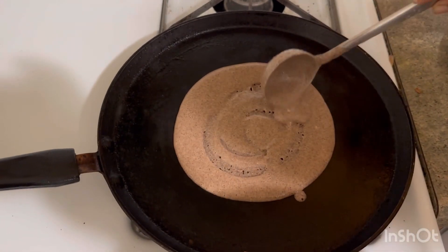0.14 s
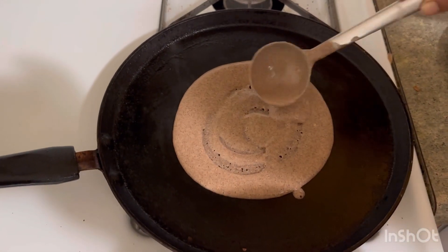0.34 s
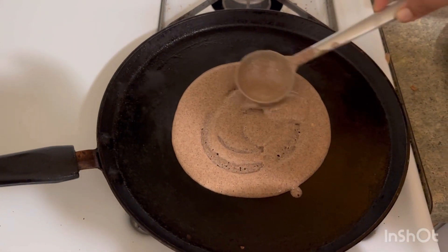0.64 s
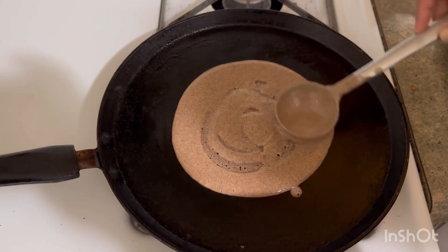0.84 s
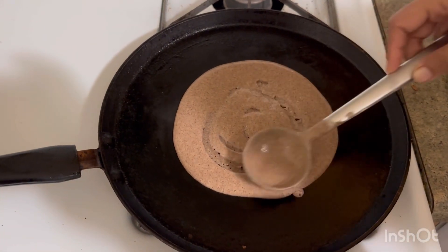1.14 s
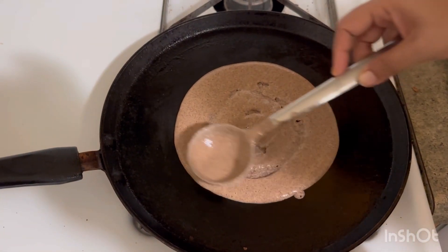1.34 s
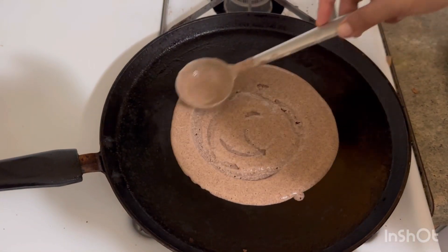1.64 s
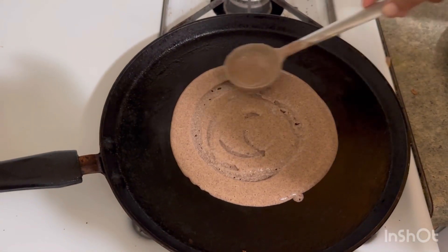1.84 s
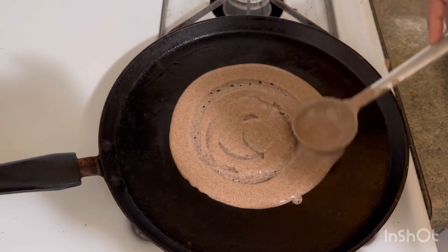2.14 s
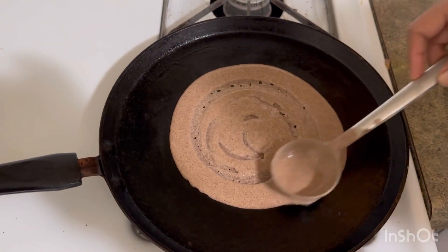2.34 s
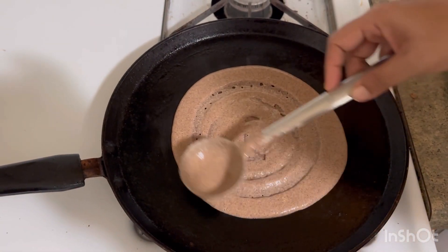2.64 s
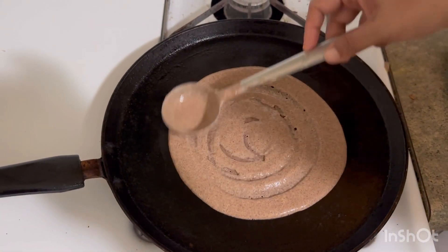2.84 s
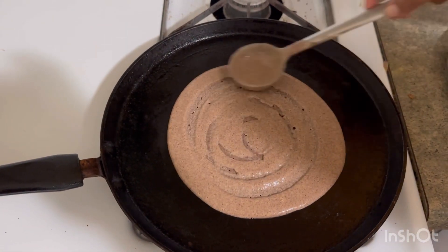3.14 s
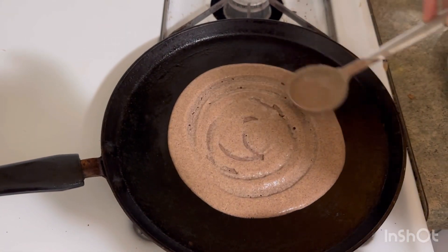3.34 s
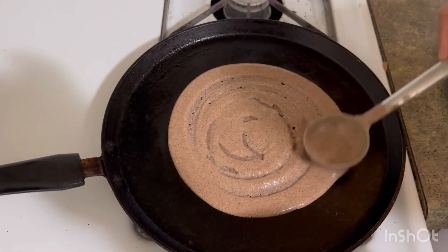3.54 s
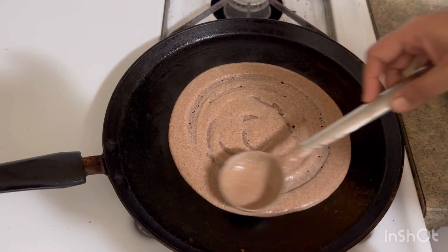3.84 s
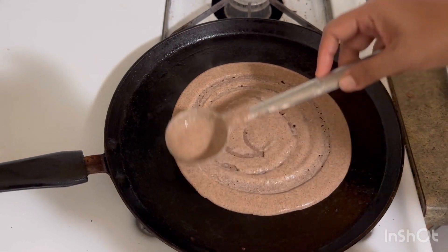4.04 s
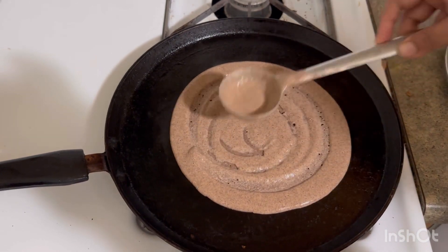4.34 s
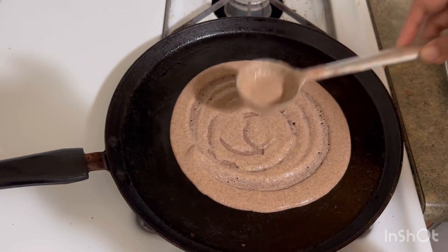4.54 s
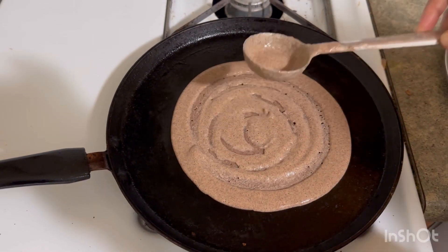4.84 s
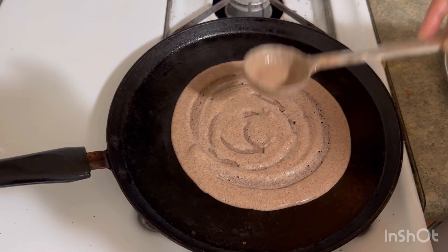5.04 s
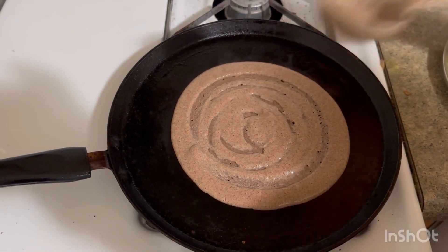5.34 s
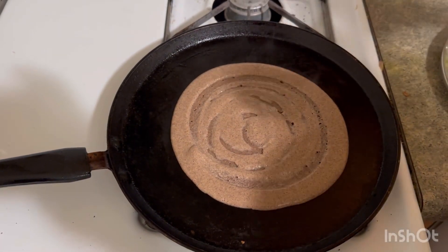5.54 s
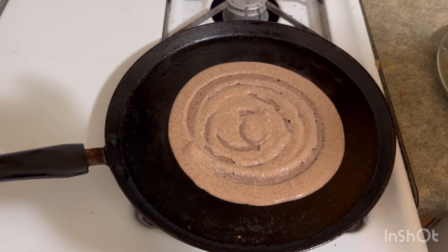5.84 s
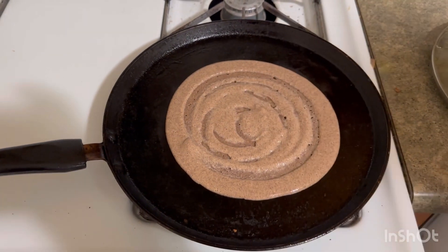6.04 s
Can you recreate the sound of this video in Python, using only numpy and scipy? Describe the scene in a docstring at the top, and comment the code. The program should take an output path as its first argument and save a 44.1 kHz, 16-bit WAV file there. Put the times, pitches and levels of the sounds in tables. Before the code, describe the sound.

Batter fizzes lightly on a hot griddle in a small kitchen, heard close, with crisp little bubble pops through the first 0.7 seconds. At about 0.8 seconds a dense, bright sizzle swells up as a steel ladle spreads the batter in circles. It stays strong until about 4 seconds, its slightly hollow colour shifting with each turn. Soft, brief wet rubs of the ladle come near 0.6, 1, 1.7 and 3 seconds, and sharper pops stand out near 1.3 and 3.8 seconds. From 4 seconds the sizzle thins to single pops, leaving only a faint airy hiss after 5 seconds, with a soft scuff near 5.5. At 6 seconds the ladle is put down a little to the right with a sharp, briefly ringing metallic knock and a tiny bounce, the loudest sound. A faint, unsteady appliance hum and low stove rumble lie underneath throughout.

```python
"""A small kitchen: a steel ladle spreads batter in circles on a hot griddle.
Steam bursts from under the wet batter as a dense sizzle, coloured by the hollows under the rubbing
ladle; it thins to single pops once the ladle lifts. The ladle is put down beside the stove with a
sharp, ringing knock. An appliance hum and the low rumble of the stove lie underneath."""
import sys
import numpy as np
from scipy import signal
from scipy.fft import rfft, irfft, next_fast_len
from scipy.io import wavfile

SR = 44100
rng = np.random.default_rng(int(sys.argv[2]) if len(sys.argv) > 2 else 0)


def int16_out(signal):
    """Quantize to a 16-bit WAV file."""
    q = np.round(np.clip(np.atleast_2d(signal).T, -1, 1) * 32767)
    wavfile.write(sys.argv[1], SR, q.astype(np.int16))


N = 272538
TIME = np.arange(N) / SR
FULL_VIGOUR_DB = -46.5  # fizz level of the liveliest sizzle


def amp(db):
    """Decibels to gain."""
    return 10 ** (np.asarray(db) / 20)


def unit_rms(x):
    """Scale to unit power."""
    return x / np.sqrt(np.mean(x ** 2) + 1e-20)


def at_time(curve):
    """A (time_s, value) table at every sample."""
    return np.interp(TIME, *np.transpose(curve))


def at_hz(curve, hz):
    """A (freq_hz, value) table read on a log-frequency axis."""
    freq_hz, value = np.transpose(curve)
    return np.interp(np.log(hz + 1e-9), np.log(freq_hz), value)


def filtered(x, response):
    """Apply a frequency response, given as a function of Hz."""
    size = next_fast_len(N + SR // 4)
    return irfft(rfft(x, size) * response(np.fft.rfftfreq(size, 1 / SR)), size)[..., :N]


def coloured(x, spectrum):
    """Equalise by a (freq_hz, gain_db) table."""
    return filtered(x, lambda hz: amp(at_hz(spectrum, hz)))


def band(x, low_hz, high_hz):
    """Causal band-pass."""
    sos = signal.butter(3, [low_hz, min(high_hz, .49 * SR)], "band", fs=SR, output="sos")
    return signal.sosfilt(sos, x + 1e-18)


def resonance(x, hz, width_hz):
    """Two-pole resonance, unit peak gain."""
    r = np.exp(-np.pi * width_hz / SR)
    feedback = [1, -2 * r * np.cos(2 * np.pi * hz / SR), r * r]
    return signal.lfilter(np.array([1, 0, -1]) * (1 - r * r) / 2, feedback, x + 1e-18)


def narrowed(x, hz, width_hz):
    """Two equal resonances in series, output at unit power."""
    return unit_rms(resonance(resonance(x, hz, width_hz), hz, width_hz))


def gliding_resonance(x, hz, width_hz):
    """Resonance with a per-sample centre, unit peak gain."""
    r = np.exp(-np.pi * width_hz / SR)
    carrier = np.exp(2j * np.pi * np.cumsum(hz) / SR)
    return 2 * np.real(carrier * signal.lfilter([1 - r], [1, -r], x / carrier))


def decay(t, t60_s):
    """Exponential decay from t = 0."""
    return (t >= 0) * np.exp(-np.log(1000) * np.clip(t / t60_s, 0, 10))


def drift(rate_hz):
    """Slow random wander, unit power."""
    return unit_rms(filtered(rng.standard_normal(N), lambda hz: 1 / (1 + (hz / rate_hz) ** 2)))


def impulses(per_s, spread_db):
    """Random impulses, most weak and a few strong, at even power."""
    chance = np.clip(per_s / SR, 1e-4, 1)
    sizes = amp(spread_db * np.minimum(rng.exponential(1, N), 4.5)) * rng.choice([-1, 1], N)
    return unit_rms((rng.random(N) < chance) * sizes / np.sqrt(chance))


def reflections(x, t60_s, delay_s):
    """Dense echoes with unit energy."""
    t = TIME[:SR // 2]
    echoes = rng.standard_normal(len(t)) * decay(t - delay_s, t60_s)
    return signal.fftconvolve(x, echoes / np.linalg.norm(echoes))[:N]


def panned(x, balance):
    """Tip the stereo balance by a (freq_hz, left_over_right_db) table."""
    return filtered(x, lambda hz: amp(np.outer([.5, -.5], at_hz(balance, hz))))


# Left-right likeness of a wide source: freq_hz, coherence
COHERENCE = [(60, 0.77), (200, 0.79), (500, 0.8), (1300, 0.61), (1620, 0.2), (2050, 1), (2800, 0.3),
             (3200, 0.74), (3500, 0.53), (4130, 0.75), (5300, 0.19), (6100, .6), (7400, 0.22), (8400, 0.79),
             (9500, 0.48), (11000, 1), (12700, 0.68), (14300, 1), (15600, 0.72)]

def spread(mid, side):
    """Left and right of a wide source, at even power."""
    def mid_share(hz):
        return (1 + np.clip(at_hz(COHERENCE, hz), 0, 1)) / 2
    mid = filtered(mid, lambda hz: np.sqrt(mid_share(hz)))
    side = filtered(side, lambda hz: np.sqrt(1 - mid_share(hz)))
    return np.array([mid + side, mid - side])


# Stove rumble spectrum: freq_hz, gain_db
RUMBLE_SPECTRUM = [(20, -40), (45, -9), (70, -1.5), (115, 1.5), (155, -3.5), (220, -0.5), (330, -1.5),
                   (420, -4), (600, -14), (1500, -39), (5000, -26.5)]
# Steady noise bands: centre_hz, width_hz, level_db
DRONE_BANDS = [(54.7, 43, -73.5), (112.6, 19, -80.5), (220, 59, -85.5), (419.2, 10.4, -82)]

def stove_rumble(fizz_db):
    """Low rumble, slightly louder under a lively sizzle, with a faint drone."""
    level_db = -71.5 + 1.5 * amp(fizz_db - FULL_VIGOUR_DB) + 2.8 * drift(1.03)
    drone = sum(amp(db) * narrowed(rng.standard_normal(N), hz, width_hz)
                for hz, width_hz, db in DRONE_BANDS)
    mid, side = (amp(level_db) * unit_rms(coloured(rng.standard_normal(N), RUMBLE_SPECTRUM))
                 for _ in range(2))
    return spread(drone + mid, side)


# Swells of the hum: start_s, length_s, level_db
HUM_SWELLS = [(0.56, 0.19, -64), (1.09, 1.16, -74), (1.56, 0.16, -67), (3.047, 0.063, -67), (4.2, 0.4, -79),
              (4.8, 0.74, -63.5), (6.01, 0.19, -59)]

def appliance_hum(pitch_hz=59.2, level_db=-74, ramp_s=0.032):
    """An unsteady hum with a weak octave, swelling now and then."""
    swells = sum(amp(db) * np.interp(TIME - start_s, [0, ramp_s, length_s, length_s + ramp_s], [0, 1, 1, 0])
                 for start_s, length_s, db in HUM_SWELLS)
    phase = 2 * np.pi * np.cumsum(pitch_hz + 1.17 * drift(5.3)) / SR
    tone = np.sqrt(2) * (np.sin(phase) + amp(-23) * np.sin(2 * phase))
    return tone * (amp(level_db + 4.8 * drift(7.3)) + swells)


# Ladle in the batter, then moved away: start_s, length_s, centre_hz, width_hz, level_db
RUB_STROKES = [(0.558, 0.0063, 2230, 300, -54.5), (0.563, 0.074, 2310, 300, -62),
               (0.555, 0.075, 1410, 220, -68), (0.562, 0.07, 2700, 1600, -61), (0.56, 0.09, 88, 70, -64),
               (0.6, 0.049, 900, 1400, -61.5), (0.652, 0.085, 1100, 1400, -68),
               (1.027, 0.096, 750, 1200, -60), (1.592, 0.061, 332, 400, -69), (1.7, 0.06, 1500, 1800, -55),
               (1.994, 0.036, 377, 500, -61.5), (3.04, 0.078, 95, 90, -61), (3.043, 0.16, 597, 800, -62),
               (3.032, 0.17, 1500, 1800, -55), (3.06, 0.046, 330, 300, -65), (3.537, 0.043, 305, 140, -66),
               (3.902, 0.05, 650, 500, -66.5), (4.424, 0.056, 900, 1200, -68),
               (4.983, 0.042, 650, 600, -78.5), (5.123, 0.026, 750, 700, -76),
               (5.495, 0.058, 1050, 1200, -64.5), (5.501, 0.083, 125, 112, -62.5),
               (5.51, 0.054, 2400, 900, -70), (5.533, 0.17, 292, 250, -70.5), (5.577, 0.11, 1510, 700, -76),
               (5.77, 0.023, 646, 400, -79), (5.927, 0.027, 520, 400, -74)]

def ladle_rubs(attack_s=0.0015):
    """Wet friction: dense slips sound through the cup of the ladle."""
    out = np.zeros(N)
    slips = impulses(per_s=4000, spread_db=2.5)
    for start_s, length_s, hz, width_hz, db in RUB_STROKES:
        t = TIME - start_s
        stroke = np.clip(t / attack_s, 0, 1) * decay(np.maximum(t - length_s, 0), t60_s=0.019)
        out += amp(db) * stroke * narrowed(slips, hz, width_hz)
    return out


# Dense clatter between the metal's main modes: freq_hz, gain_db
CLATTER_SPECTRUM = [(60, -10), (200, -19), (380, -6.5), (700, -0.5), (1450, 2.5), (1800, -10.5),
                    (2300, 3.5), (3000, -4), (4200, 6), (8800, 5), (10000, 1.5), (10800, 3), (11800, 2.5),
                    (15500, -4.5)]

def metal_shimmer(t, count=60, low_hz=3000, high_hz=11030):
    """Weak, unevenly spaced upper modes; complex, so their phase can be turned."""
    hz = low_hz + (high_hz - low_hz) * (np.arange(count) + rng.random(count)) / count
    gains = amp(at_hz(CLATTER_SPECTRUM, hz) + 2.4 * rng.standard_normal(count))
    phasors = gains / np.linalg.norm(gains) * np.exp(2j * np.pi * rng.random(count))
    return np.sqrt(2) * phasors @ np.exp(2j * np.pi * np.outer(hz, t))


# Landing and bounces: start_s, level_db
CONTACTS = [(6.0093, 0.5), (6.0273, -10), (6.036, -5)]
# Modes of ladle and bowl: pitch_hz, gain_db, t60_s
METAL_MODES = [(560, -11.5, 0.3), (634, -15, 0.22), (686, -2, 0.31), (721, 0, 0.24), (778, -6, 0.31),
               (864, -1.5, 0.19), (984, -0.5, 0.13), (1050, -9, 0.14), (1290, -1, 0.18), (1344, 5, 0.25),
               (1365, -1.5, 0.33), (1430, -5, 0.31), (1500, 0, 0.19), (1590, -12, 0.37), (2015, -8, 0.19),
               (2270, -2.5, 0.26), (2400, -9, 0.19), (3370, -12, 0.27), (3620, -8, 0.22), (3760, -1, 0.22),
               (4060, -7, 0.24), (4130, 11, 0.039), (4300, 14, 0.035), (4560, -6, 0.2), (4760, 3.5, 0.065),
               (5100, -6, 0.22), (5300, -2, 0.2), (5346, 5, 0.23), (5749, -7, 0.27), (5950, -1, 0.11),
               (6640, 2, 0.21), (6954, 2, 0.15), (7060, 1, 0.17), (7630, 5, 0.14), (8100, 6, 0.12),
               (8500, 6, 0.12), (8840, 4, 0.15), (9130, 4, 0.2), (9420, 5, 0.14), (10750, 11, 0.08),
               (13200, 4, 0.07)]

def ladle_contacts(phase_rad, shimmer):
    """Each contact cracks and rings the metal; the kitchen holds a tail whose lows last longer."""
    out = np.zeros(N)
    for start_s, db in CONTACTS:
        start = round(start_s * SR)
        t = TIME[:N - start]
        clatter = unit_rms(coloured(rng.standard_normal(N), CLATTER_SPECTRUM))[start:]
        crack = amp(-20.5) * clatter * decay(t, t60_s=0.021)
        bright = amp(-40) * np.imag(shimmer[:len(t)] * np.exp(1j * phase_rad)) * decay(t, t60_s=0.21)
        tail = amp(-34.5) * clatter * decay(t, t60_s=0.33)
        tail += amp(-32) * band(clatter, 60, 2330) * decay(t, t60_s=0.39)
        low_noise = unit_rms(resonance(rng.standard_normal(len(t)), hz=198, width_hz=110))
        thud = amp(-53) * low_noise * decay(t, t60_s=0.27)
        ring = sum((-1) ** k * amp(mode_db - 40.5) * np.sin(2 * np.pi * hz * t + phase_rad)
                   * decay(t, t60_s) for k, (hz, mode_db, t60_s) in enumerate(METAL_MODES))
        attack = 1 - np.exp(-t / 0.00041)
        # Light bounces mostly click: the ring grows with the square of the blow.
        out[start:] += amp(db) * attack * (crack + bright + tail + thud + amp(db) * ring)
    return out


# Stereo width of the knock: freq_hz, side_gain_db
KNOCK_SIDE = [(60, -5), (200, -14), (380, 1), (700, -0.5), (1300, 1.5), (2100, 1), (4400, -0.5), (8200, -8),
              (10500, -13.5), (14000, -28)]
# Balance of the knock: freq_hz, left_over_right_db
KNOCK_BALANCE = [(250, 0), (700, -5.5), (1000, -2), (1400, -4), (2200, -1), (4200, 1.5), (8000, -1),
                 (10000, 0)]

def ladle_knock():
    """The ladle lands off to one side: the side signal rings a quarter cycle behind the mid."""
    shimmer = metal_shimmer(TIME[:SR // 4])
    mid = ladle_contacts(0, shimmer)
    side = coloured(ladle_contacts(-np.pi / 2, shimmer), KNOCK_SIDE)
    return panned(np.array([mid + side, mid - side]), KNOCK_BALANCE)


# Largest bubbles; the smaller among them snap higher: start_s, level_db, low_cut_hz
BUBBLES = [(0.0697, -42, 1500), (0.0815, -30.5, 1500), (0.1974, -37, 4040), (0.2289, -35, 1500),
           (0.236, -35, 5000), (0.2608, -38, 3000), (0.2992, -41, 3000), (0.3145, -33, 1200),
           (0.414, -39, 1200), (0.4542, -34.5, 1200), (0.4648, -44, 1100), (0.4912, -37, 3000),
           (0.497, -31.5, 3030), (0.5137, -39, 1200), (0.5638, -31, 5000), (0.63, -38, 1500),
           (0.7305, -41, 4000), (1.1642, -32, 1500), (1.3214, -25.5, 1500), (3.8382, -28, 1500),
           (4.1415, -32, 3000), (4.156, -30, 6000), (4.1609, -34, 1200), (4.2048, -36, 3000),
           (4.2275, -37, 1500), (4.241, -35, 3000), (4.306, -36, 3000), (4.3251, -33, 5800),
           (4.4279, -32, 8000), (4.572, -44, 1200), (4.6409, -47, 4000), (4.7087, -42, 1200),
           (4.911, -51, 1200), (5.1233, -45, 900), (5.1723, -43.5, 1500), (5.2205, -47, 4000)]
# Pop colour on top of the steam spectrum: freq_hz, gain_db
POP_TILT = [(2000, 0), (6000, 1.5), (9500, 1), (14000, 1)]

def bubble_pops(fizz_db, stray_per_s=18, stray_db=-36.5, stray_low_hz=900):
    """Bubbles burst with a snap and a spit of steam; small random ones follow the fizz level."""
    strays = [(TIME[i], stray_db + fizz_db[i] - FULL_VIGOUR_DB, stray_low_hz)
              for i in np.flatnonzero(rng.random(N) < stray_per_s / SR)]
    t = TIME[:SR // 20]
    snap = amp(7.5) * (t == 0)
    spit = amp(-14) * decay(t, t60_s=0.015)
    out, noise = np.zeros(N + SR), rng.standard_normal(N + SR)
    for start_s, db, low_cut_hz in list(BUBBLES) + strays:
        span = round((start_s + 0.0011) * SR) + np.arange(len(t))
        out[span] += amp(db) * band(snap + spit * noise[span], low_cut_hz, SR / 2)
    return coloured(coloured(out[:N], STEAM_SPECTRUM), POP_TILT)


TURN_S, FAR_SIDE_S = 1.36, 1.68  # period of the ladle's circle; time of one far-side pass

def far_side_pass(sigma_s=0.22):
    """Rises to 1 each time the ladle sweeps the far side of the griddle."""
    offset_s = (TIME - FAR_SIDE_S + TURN_S / 2) % TURN_S - TURN_S / 2
    return np.exp(-.5 * (offset_s / sigma_s) ** 2)


# Resonances between ladle and griddle: centre_hz, width_hz, gain_db, after_far_side_s, swing_db
HOLLOW_MODES = [(3173, 114, -1, 0.3, -4), (4120, 91, 2, 0.58, 7.5)]
# Nearness of ladle to griddle: time_s, hollow_gain_db
LADLE_NEARNESS = [(0, -6), (0.68, -4), (0.77, 5), (0.88, -2), (0.97, 4), (1.12, -7), (2.0, -1), (3.9, -2.5),
                  (4.6, 1)]

def ladle_hollows(steam, wander=0.011):
    """Adds the hollows under the ladle, which open, close and shift as it circles."""
    near_db = at_time(LADLE_NEARNESS)
    out = steam.copy()
    for hz, width_hz, db, after_s, swing_db in HOLLOW_MODES:
        away = np.sin(np.pi * (TIME - FAR_SIDE_S - after_s) / TURN_S) ** 2
        centre_hz = hz * (1 + wander * drift(4.7))
        out += amp(db + near_db - swing_db * away) * gliding_resonance(steam, centre_hz, width_hz)
    return out


# Steam escaping through batter: freq_hz, gain_db
STEAM_SPECTRUM = [(200, -36), (550, -11.5), (780, -6.5), (950, -6.5), (1250, -1), (1530, 1.5), (1900, -1.5),
                  (2850, -3.5), (4500, -3), (5100, -1.3), (6600, -1.5), (7300, 0), (7750, -1.5),
                  (8450, 2.5), (9300, 0.5), (11000, 2.5), (12300, 5.2), (12750, 1.5), (14400, 5)]

def steam_bursts(per_s):
    """Tiny bursts all over the batter, as mid and side streams with a flickering level."""
    bursts = np.array([impulses(per_s, spread_db=3.5) for _ in range(2)])
    hiss = amp(-8.5) * rng.standard_normal((2, N))
    steam = ladle_hollows(coloured(bursts + hiss, STEAM_SPECTRUM))
    return steam * amp(0.85 * drift(30))


# Vigour of the escaping steam: time_s, level_db
FIZZ_LEVEL = [(0, -54), (0.1, -54.5), (0.19, -57.5), (0.42, -64), (0.6, -62), (0.72, -67.5), (0.77, -56),
              (1.0, -49.5), (1.35, -48.5), (1.73, -47.5), (1.95, -48.5), (2.2, -50.5), (2.48, -48.5),
              (2.75, -48.5), (2.97, -46.5), (3.3, -49), (3.42, -49), (3.6, -50), (3.9, -51), (4.12, -55.5),
              (4.22, -59.5), (4.4, -62.5), (4.7, -67), (4.9, -71), (5.03, -75.5), (5.14, -71.5),
              (5.36, -74.5), (5.5, -67.5), (5.62, -72), (5.97, -72.5)]
# Airy hiss of the drying batter: time_s, level_db
DRYING_LEVEL = [(5.0, -71), (5.45, -67.5), (6.1, -66.5)]

def sizzle(fizz_db):
    """Fresh batter on hot iron makes the steam bursts louder, denser and shriller."""
    vigour_db = np.minimum(fizz_db - FULL_VIGOUR_DB, 0)
    far_side = far_side_pass()
    steam = steam_bursts(per_s=16000 * amp(.6 * vigour_db))
    # Big slow bubbles sound low, the finest spray highest.
    bubbling = filtered(steam, lambda hz: 1 / (1 + (hz / 3200) ** 4))
    spray = filtered(steam, lambda hz: 1 - 1 / (1 + (hz / 10500) ** 8))
    fizz = steam - bubbling - spray
    singing = far_side * amp(3.5 + 4.8 * vigour_db) * resonance(fizz, hz=6300, width_hz=690)
    spray_db = fizz_db + 5.5 + 0.46 * vigour_db + 2.5 * far_side
    spray_gain = np.hypot(amp(spray_db), amp(at_time(DRYING_LEVEL)))
    bubbling_db = fizz_db - 2.2 + 0.083 * vigour_db
    bubbling_gain = 1 / np.hypot(amp(-bubbling_db), 1 / amp(-51))  # soft ceiling
    return (amp(fizz_db + 1) * unit_rms(fizz + singing)
            + spray_gain * amp(drift(9.6)) * unit_rms(spray)
            + bubbling_gain * amp(0.53 * drift(12)) * unit_rms(bubbling))


def scene():
    """Griddle straight ahead, widened by echoes of stove top and walls; the knock off to one side."""
    fizz_db = at_time(FIZZ_LEVEL)
    mid, side = sizzle(fizz_db)
    pops_and_rubs = bubble_pops(fizz_db) + ladle_rubs()
    mid += pops_and_rubs
    side += amp(4) * reflections(pops_and_rubs, t60_s=0.023, delay_s=0.00014)  # stove top
    mid, side = (x + amp(-11) * reflections(x, t60_s=0.078, delay_s=0.00605) for x in (mid, side))
    return spread(mid, side) + ladle_knock() + stove_rumble(fizz_db) + appliance_hum()


# Microphone balance: freq_hz, left_over_right_db
MIC_BALANCE = [(100, -.4), (400, -.5), (700, 3), (900, .5), (1150, 1.2), (1600, -1), (2000, 0), (2700, -.8),
               (3250, 1.8), (3600, .3), (4800, 1.3), (5400, 3), (7200, 1.5), (7800, 3.3), (8600, 0)]
# Microphone phase: freq_hz, left_lead_rad
MIC_PHASE = [(200, 0), (1000, .2), (1480, -1.1), (1800, .1), (3100, 1), (4200, .35), (6950, .65),
             (7500, 2.6), (8000, -.2), (8900, -.5), (9900, -2.1), (10600, -3.14), (11900, -3.14),
             (12500, -4.3), (13100, -5.2), (13900, -6.28)]

def record(dry, cutoff_hz=15720):
    """Two close microphones whose balance and phase vary with frequency; the top is cut."""
    heard = panned(dry, MIC_BALANCE)
    heard = filtered(heard, lambda hz: np.exp(1j * np.outer([.5, -.5], at_hz(MIC_PHASE, hz))))
    return signal.sosfilt(signal.ellip(12, .1, 80, cutoff_hz, fs=SR, output="sos"), heard)


dry = scene()
out = record(dry)
int16_out(out)
```